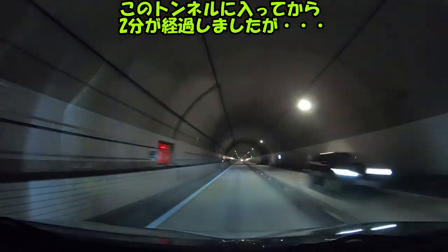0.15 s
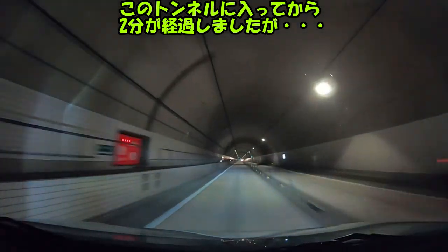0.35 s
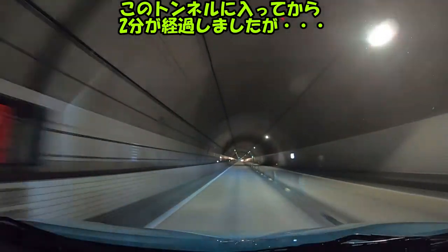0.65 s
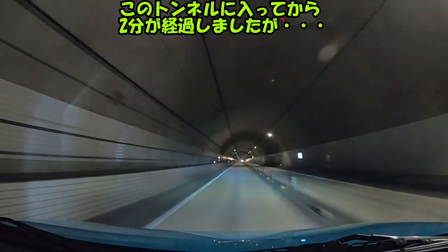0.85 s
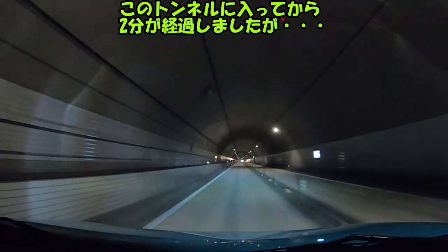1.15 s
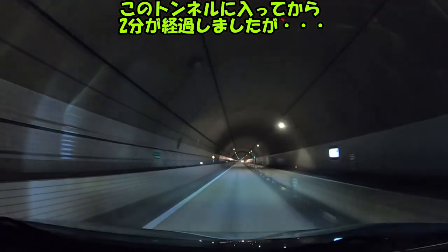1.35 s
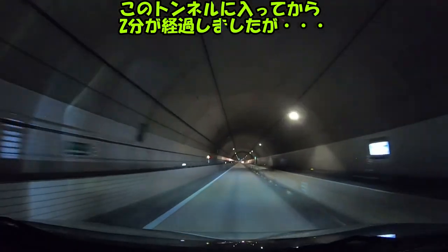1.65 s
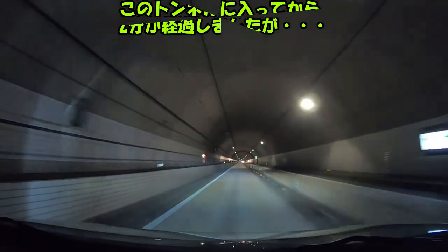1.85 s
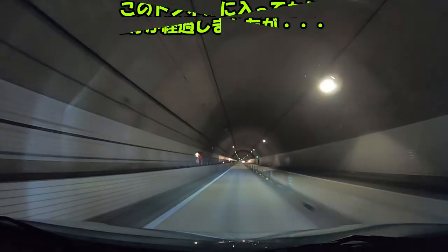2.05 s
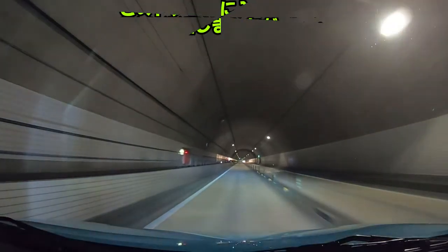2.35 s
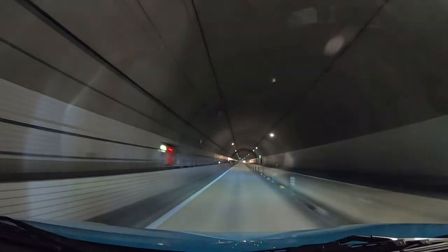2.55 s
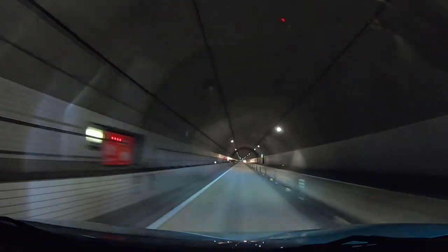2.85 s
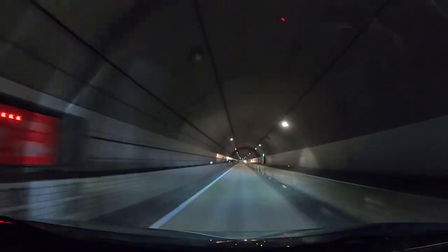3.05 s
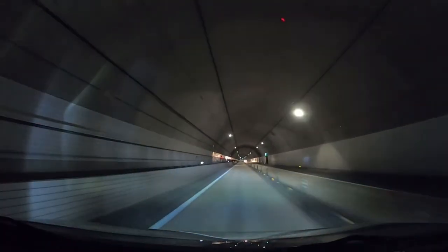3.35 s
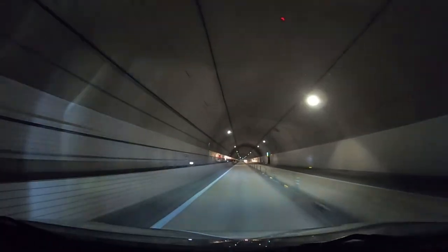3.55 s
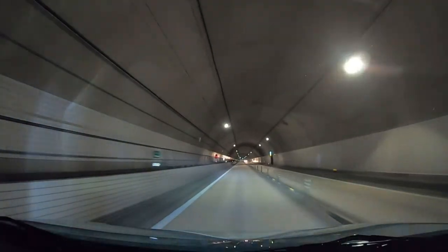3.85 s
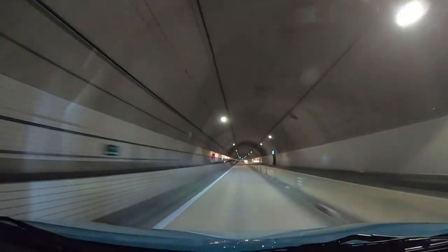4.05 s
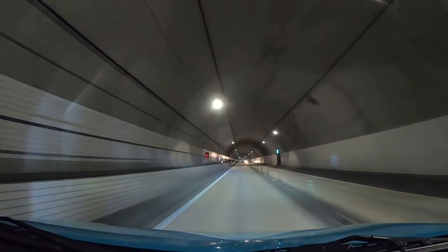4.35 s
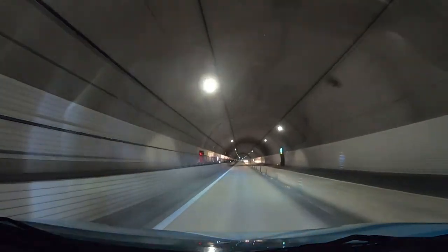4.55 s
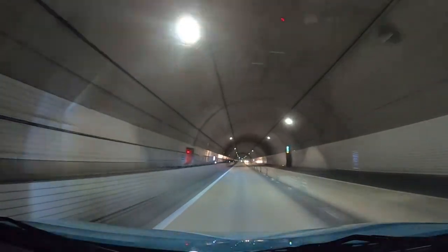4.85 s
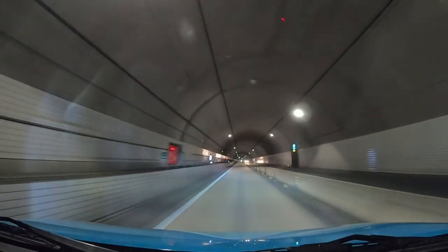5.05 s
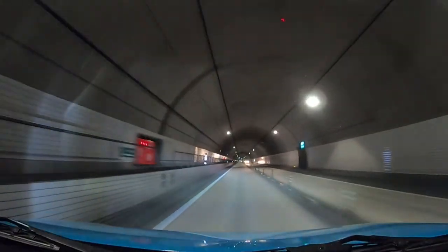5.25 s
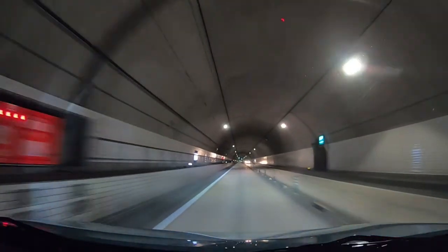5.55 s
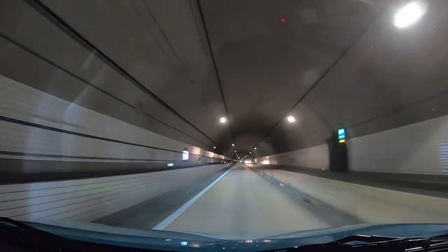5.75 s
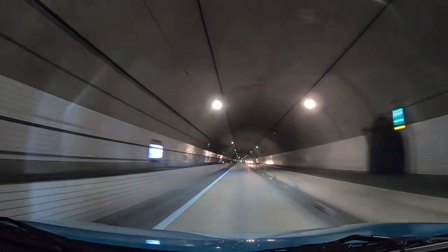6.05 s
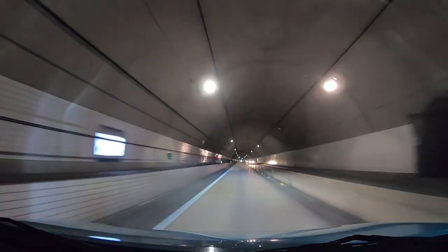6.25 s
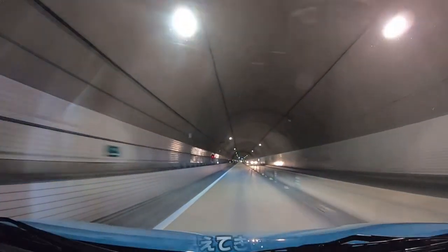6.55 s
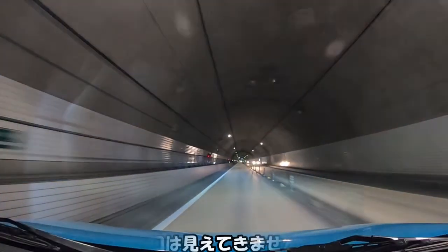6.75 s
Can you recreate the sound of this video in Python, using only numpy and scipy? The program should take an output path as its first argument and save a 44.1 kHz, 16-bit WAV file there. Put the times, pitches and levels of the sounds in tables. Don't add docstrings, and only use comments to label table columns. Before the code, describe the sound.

Heard from the dashboard of a car driving fast through a tunnel: a heavy low boom, humming tyres and droning engine run throughout. Tyre and wind roar reflects from the walls, slightly brighter at first just after an oncoming car. A faint fan whine rises and passes near one second, and plastic trim ticks very quietly here and there.

```python
import sys
import numpy as np
from scipy import signal
from scipy.fft import rfft, irfft
from scipy.io import wavfile
from scipy.ndimage import uniform_filter1d

SR = 44100
rng = np.random.default_rng(int(sys.argv[2]) if len(sys.argv) > 2 else 0)


def magnitude_from_level(level_db):
    exponent = np.asarray(level_db, float) / 20
    return 10 ** exponent


def master(y):
    cut = np.clip(np.atleast_2d(y).T, -1, 1)
    pcm = np.round(cut * 32767)
    wavfile.write(sys.argv[1], SR, pcm.astype(np.int16))


N = 304290

# centre [s], half length [s], added level [dB].
BOOM_SWELLS = [(0.1, 0.07, -21), (0.4, 0.05, -38), (0.56, 0.029, -28), (0.93, 0.086, -32),
               (1.22, 0.058, -22), (1.6, 0.08, -23), (1.96, 0.051, -22), (2.07, 0.088, -27),
               (2.38, 0.16, -39), (2.56, 0.11, -28), (2.79, 0.18, -25), (3.34, 0.19, -31.5),
               (3.58, 0.18, -26.5), (3.81, 0.029, -24), (3.91, 0.08, -24.5), (4.15, 0.13, -32),
               (4.56, 0.11, -24), (4.93, 0.12, -26), (5.23, 0.15, -24), (5.55, 0.25, -30),
               (5.88, 0.04, -24), (6.17, 0.099, -26), (6.41, 0.045, -33), (6.62, 0.098, -30)]
# centre [s], half length [s], added level [dB].
TYRE_SWELLS = [(0.02, 0.047, -29.5), (0.31, 0.18, -30), (0.6, 0.07, -25), (0.85, 0.23, -27.5),
               (1.07, 0.04, -33), (1.24, 0.057, -45), (1.47, 0.074, -30.5), (1.76, 0.039, -34),
               (1.88, 0.11, -38.5), (2.05, 0.045, -26.5), (2.25, 0.08, -37.5), (2.65, 0.14, -27),
               (2.87, 0.055, -29.0), (3.1, 0.085, -45.5), (3.36, 0.11, -27), (3.68, 0.13, -24.5),
               (4.05, 0.1, -31.5), (4.35, 0.047, -29), (4.65, 0.076, -34), (4.89, 0.11, -32.5),
               (5.21, 0.067, -30), (5.45, 0.1, -32), (5.72, 0.13, -24.5), (5.92, 0.035, -27.5),
               (6.19, 0.1, -27.5), (6.59, 0.04, -35.5)]
# centre [s], half length [s], added level [dB], pitch [Hz].
ENGINE_SWELLS = [(0.43, 0.21, -32.5, 115.5), (0.7, 0.06, -34, 116.3), (0.91, 0.043, -30, 111.9),
                 (1.12, 0.14, -28, 112.8), (1.56, 0.21, -39, 113.7), (1.98, 0.07, -30, 111.5),
                 (2.31, 0.12, -27, 110), (2.56, 0.052, -36, 111.6), (2.74, 0.06, -34, 114.8),
                 (3.02, 0.033, -18.5, 114.1), (3.12, 0.026, -23.5, 111.6), (3.32, 0.029, -28, 117),
                 (3.61, 0.12, -24, 112.6), (3.84, 0.064, -28, 112.9), (4.03, 0.05, -26, 111.4),
                 (4.2, 0.054, -21.5, 115.5), (4.37, 0.032, -26, 114.2), (4.58, 0.067, -24.5, 113.4),
                 (4.77, 0.04, -25, 112.1), (4.91, 0.02, -28.5, 110.8), (5.04, 0.055, -24.5, 113.8),
                 (5.23, 0.03, -24, 113.4), (5.64, 0.12, -26.5, 114.1), (6.29, 0.19, -28, 115.1),
                 (6.61, 0.038, -27, 114.8), (6.77, 0.037, -28.5, 117.7)]
# resonance [Hz], width [Hz], level [dB].
LARGE_PANELS = [(22, 7.7, -3.5), (40.8, 4.1, -1.5), (50.3, 9, 0.5), (62.5, 12, -9), (82.7, 31, -4),
                (96.4, 13, -1), (103.3, 11, -5)]
# centre [s], half length [s], added level [dB].
LARGE_JOLTS = [(0.1, 0.072, -41), (0.42, 0.15, -27), (0.83, 0.092, -30), (1.15, 0.12, -30.5),
               (1.49, 0.066, -39.5), (1.79, 0.16, -29.5), (2.19, 0.04, -35.5), (2.37, 0.066, -26.5),
               (2.79, 0.23, -30.5), (3.2, 0.067, -30), (3.53, 0.23, -36), (3.73, 0.031, -28),
               (3.98, 0.23, -36.5), (4.28, 0.04, -32.5), (4.42, 0.05, -24), (4.72, 0.15, -36.5),
               (4.73, 0.071, -32.5), (4.97, 0.067, -27.5), (5.26, 0.04, -35.0), (5.49, 0.035, -32),
               (5.78, 0.13, -28.5), (6.1, 0.047, -30), (6.36, 0.17, -24.5), (6.75, 0.12, -29.5)]
# resonance [Hz], width [Hz], level [dB].
SMALL_PANEL_MODES = [(131.1, 12, 6.5), (140.9, 16, 4.5), (163.8, 13, 4), (185, 22, 1.5), (211, 12, -13),
                     (218.4, 27, -0.5), (253.5, 18, 3.5), (281.2, 32, -1), (323, 52, -8), (358, 10, -6.5),
                     (401.5, 30, -10), (428, 11, -9), (463, 15, -17), (613, 36, -20), (624, 24, -20)]
# centre [s], half length [s], added level [dB].
SMALL_PANEL_JOLTS = [(0.1, 0.1, -39), (0.66, 0.21, -37), (1.17, 0.19, -39.5), (1.55, 0.082, -42),
                     (1.89, 0.1, -41), (2.17, 0.024, -32), (2.42, 0.2, -40), (2.71, 0.04, -39),
                     (3.05, 0.21, -39.5), (3.26, 0.024, -42), (3.67, 0.06, -32.5), (3.89, 0.12, -52.5),
                     (4.13, 0.044, -34.5), (4.53, 0.15, -44.5), (4.83, 0.098, -39), (5.2, 0.085, -44),
                     (5.32, 0.041, -36.5), (5.66, 0.11, -40.5), (5.91, 0.077, -33.5), (6.32, 0.06, -41),
                     (6.53, 0.036, -40), (6.78, 0.07, -36)]
# centre [Hz], width [Hz], level [dB].
PORT_WIND = [(30, 30, 5.5), (70, 40, -2.5), (110, 50, -7.0)]
# time [s], level [dB].
ROAR_LEVEL = [(0.0, -41.5), (1.5, -42), (3.1, -42.5), (4.3, -42.5), (5.2, -43), (6.0, -41.5), (6.9, -42)]
# frequency [Hz], density [dB per Hz].
ROAR_SPECTRUM = [(410, -14.5), (610, -23.5), (1000, -25), (1450, -29.5), (1800, -32), (2050, -37.5),
                 (3400, -43.5), (4700, -51), (4900, -54), (5600, -55.5)]
# frequency [Hz], level relative to the end of the roar [dB].
WIND_HISS = [(6100, -4.5), (7000, -5.5), (7600, -9), (9200, -14), (10000, -20), (10600, -25), (11500, -29),
             (12000, -30), (13500, -26), (15500, -25)]
# frequency [Hz], left-right correlation [0 to 1].
PORT_LIKENESS = [(380, 0.86), (700, 0.53), (1100, 0.73), (1500, 0.47), (1600, 0.73), (1850, .65),
                 (2000, .3), (3500, 0.43), (3700, .55), (4800, .5), (5200, 0.05), (9000, 0.5)]
# frequency [Hz], lead of the left [radians].
LEFT_LEAD = [(0, 0.47), (600, -0.52), (1030, 2.08), (1380, 0.65), (1640, 0.39), (1980, 1.2), (2330, 0),
             (5000, -0.17)]
# frequency [Hz], left minus right [dB].
PORT_BALANCE = [(250, 0.5), (660, -1.5), (1700, -1.3), (4460, -1.3), (9000, -3.5)]
# time [s], peak level [dB], left minus right [dB], extra level of the thin top modes [dB].
TRIM_TICKS = [(0.079, -76, 0, 0), (0.266, -75, 0, 17), (0.289, -65, -2.5, -18), (0.34, -74, -2, 14),
              (0.7268, -66, -2, 6), (1.0864, -69, -3, -19), (1.1937, -64, -1, -18), (1.285, -65, -1, -18),
              (1.3803, -64, 0, -18), (1.4597, -74, -3.5, 15), (1.7764, -65, 1, -14), (1.8637, -67, -1, -14),
              (2.48, -69.5, -1, 10), (2.7911, -62, -1.5, -18), (2.905, -69, 1, -6),
              (3.12, -69.5, -4.5, 11.5), (3.46, -66.5, 4, -13), (3.5937, -59.5, -2, -6.5),
              (3.6847, -54.5, 1, -9), (3.692, -59, 0, -8), (3.711, -63, -2, -11), (3.826, -75, -3, 18.5),
              (3.905, -74, 2, 16), (4.7696, -60, -1.5, -16), (5.064, -64, 0, -18), (5.16, -66, 0, -18),
              (5.4798, -71.5, 2.5, 12.5), (5.617, -75, 0.5, 15.5), (5.6376, -59, -1, -18),
              (5.677, -68.5, 0, -14), (5.7753, -64, -2, -18)]
# frequency [Hz], level [dB], time to fall 60 dB [s].
TRIM_MODES = [(5200, 0.5, .004), (6800, 2.5, .005), (7800, -3, .005), (8700, -2.5, .006), (9600, -2, 0.007),
              (11000, -4, .002), (12000, -4, .002), (13000, -4, .002), (14000, -4, .002), (14800, -4, .002)]
# time [s], level [dB], pitch [Hz].
FAN_WHINES = [
    [(.78, -55, 1700), (.88, -53, 1712), (.96, -51.5, 1708), (1.06, -52.5, 1725), (1.15, -48, 1765),
     (1.22, -55, 1785), (1.3, -52, 1800), (1.42, -60, 1810)],
    [(.35, -82, 4690), (.55, -77, 4660), (.66, -65.5, 4700), (.74, -69, 4690), (.85, -74, 4680),
     (1.1, -77, 4700), (1.25, -77, 4654)],
]


def evened(x):
    return x / np.sqrt(np.mean(abs(x) ** 2) + 1e-20)


def read(points, hz):
    f, value = np.transpose(points)
    return np.interp(np.log(hz + 1), np.log(f + 1), value)


def curves(rows):
    s, *columns = np.transpose(rows)
    return [np.interp(np.arange(N) / SR, s, c) for c in columns]


def swells(rows, rest_db):
    t = np.arange(0, N + 100, 100) / SR
    level = magnitude_from_level(rest_db)
    level = level + sum(magnitude_from_level(db) * np.exp(-((t - s) / half) ** 2) for s, half, db, *_ in rows)
    return np.interp(np.arange(N) / SR, t, 20 * np.log10(level))


def drift(hz):
    f = np.fft.fftfreq(N, 1 / SR)
    noise = rng.standard_normal((N, 2)) @ [1, 1j]
    return evened(np.fft.ifft(noise * np.exp(-(f / hz) ** 2)))


def fuzzy_tone(db, hz, fuzz, fuzz_hz):
    carrier = np.exp(2j * np.pi * np.cumsum(hz * np.ones(N)) / SR)
    tone = carrier * (1 + fuzz * drift(fuzz_hz))
    return magnitude_from_level(db) * evened(tone.real)


def panels(modes, level_db, steady, smooth_s):
    hz = np.fft.rfftfreq(N, 1 / SR)
    power = sum(magnitude_from_level(2 * db) / (1 + (2 * (hz - f) / width) ** 2) ** 2 for f, width, db in modes)
    x = evened(irfft(rfft(rng.standard_normal(N)) * np.sqrt(power), N))
    swell = np.convolve(x[::50] ** 2, np.hanning(round(smooth_s * SR / 50)), "same")
    swell = np.interp(np.arange(N), np.arange(len(swell)) * 50, swell / swell.mean())
    return magnitude_from_level(level_db) * evened(x / (swell + .05) ** (steady / 2))


def cabin_boom():
    return fuzzy_tone(swells(BOOM_SWELLS, rest_db=-28), hz=33.43, fuzz=0.32, fuzz_hz=3.4)


def tyre_hum():
    return fuzzy_tone(swells(TYRE_SWELLS, rest_db=-38.5), hz=233.2, fuzz=0.12, fuzz_hz=6.8)


def engine_drone():
    pitch_hz = curves(ENGINE_SWELLS)[2] + 5.0 * drift(hz=9.26).real
    return fuzzy_tone(swells(ENGINE_SWELLS, rest_db=-31), pitch_hz, fuzz=0.52, fuzz_hz=13)


def body_panels():
    large_db = swells(LARGE_JOLTS, rest_db=-25.5) + 0.59
    small_db = swells(SMALL_PANEL_JOLTS, rest_db=-29.5) + 1.5
    large = panels(LARGE_PANELS, large_db, steady=1.0, smooth_s=0.23)
    return large + panels(SMALL_PANEL_MODES, small_db, steady=0.83, smooth_s=0.3)


def port_differences():
    wind = panels(PORT_WIND, -43.5, steady=0, smooth_s=.1)
    return wind + panels(SMALL_PANEL_MODES, -46.0, steady=0, smooth_s=.1)


def body():
    mid = cabin_boom() + tyre_hum() + engine_drone() + body_panels()
    return mid * magnitude_from_level([[-.2], [.2]]) + port_differences() * np.array([[1], [-1]])


def hiss_edge_db(hz, frames):
    gusts = rng.standard_normal((frames, 513)).T
    gusts = uniform_filter1d(gusts, size=14, axis=0)
    gusts = evened(uniform_filter1d(gusts, size=6, axis=1))
    gusts_db = 3.5 * gusts * np.clip((hz[:, None] - 9800) / 1500, 0, 1)
    flutter = evened(uniform_filter1d(rng.standard_normal(frames), size=6))
    edge_hz = 10600 + 260 * flutter
    return gusts_db - 17 * np.clip((hz[:, None] - edge_hz) / 150, 0, 1)


def oncoming_db(hz, t):
    band = np.exp(-(np.log2((hz + 1) / 3950) / 1.0) ** 2)
    return np.outer(band, 3.5 * np.exp(-(t / 0.95) ** 2))


def roar():
    frames, hz = N // 256 + 5, np.fft.rfftfreq(1024, 1 / SR)
    at = np.arange(frames) * 256
    a, b, c, d, patches = rng.standard_normal((frames, 513, 5)).T
    patches = uniform_filter1d(patches, size=10, axis=0)
    patches = evened(uniform_filter1d(patches, size=20, axis=1))
    level_db = np.interp(at, np.arange(N), curves(ROAR_LEVEL)[0])

    same = np.clip(read(PORT_LIKENESS, hz), -1, 1)[:, None]
    left = a + 1j * b
    right = same * left + np.sqrt(1 - same ** 2) * (c + 1j * d)
    right = right * np.exp(-1j * read(LEFT_LEAD, hz))[:, None]
    balance = magnitude_from_level(np.outer([.5, -.5], read(PORT_BALANCE, hz)))[:, :, None]
    z = np.array([left, right]) * balance

    roar_end_db = ROAR_SPECTRUM[-1][1]
    spectrum = ROAR_SPECTRUM + [(f, db + roar_end_db) for f, db in WIND_HISS]
    glass_db = -12 * np.log2(np.clip(600 / (hz + 1), 1, None))
    colour_db = read(spectrum, hz) + glass_db
    shape_db = colour_db[:, None] + 0.31 * patches + hiss_edge_db(hz, frames)
    shape_db = shape_db + oncoming_db(hz, at / SR) + level_db
    x = signal.istft(z * magnitude_from_level(shape_db), nperseg=1024, noverlap=768)[1][:, :N]

    power = magnitude_from_level(2 * colour_db)
    band_share = np.sqrt(np.sum(power[(hz > 600) & (hz < 2000)]) / np.sum(power))
    return evened(x) / band_share * np.sqrt(np.mean(magnitude_from_level(2 * level_db))) * magnitude_from_level(2.5)


def trim_ticks():
    t, out = np.arange(600) / SR, np.zeros((2, N + 600))
    rise_s, scraping = .0002, 0.8
    scrapes = rng.standard_normal((len(TRIM_TICKS), 2, 600))
    scrapes = evened(signal.lfilter([1], [1, -.87], scrapes))
    detunes = rng.uniform(1.0, 1.05, (len(TRIM_TICKS), len(TRIM_MODES)))
    for (s, db, pan_db, thin_db), detune, scrape in zip(TRIM_TICKS, detunes, scrapes):
        ring = 0
        for (hz, mode_db, t60), k in zip(TRIM_MODES, detune):
            decay_db = mode_db + thin_db * (hz > 10500) - 60 * t / t60
            ring = ring + magnitude_from_level(decay_db) * np.sin(2 * np.pi * hz * k * t)
        ring = ring * (1 - np.exp(-t / rise_s))
        ring = ring * (1 + scraping * scrape) / np.hypot(1, scraping)
        at = round(s * SR)
        out[:, at:at + 600] += magnitude_from_level(db - 1.0 + np.array([[.5], [-.5]]) * pan_db) * ring
    return out[:, :N]


def fan_whine(rows):
    start, end = rows[0][0], rows[-1][0]
    on = np.interp(np.arange(N) / SR, [start, start + 0.1, end - .08, end], [0, 1, 1, 0])
    level_db, pitch_hz = curves(rows)
    return magnitude_from_level([[.3], [-.3]]) * on * fuzzy_tone(level_db, pitch_hz, fuzz=1.1, fuzz_hz=75)


def scene():
    return body() + roar() + trim_ticks() + sum(fan_whine(rows) for rows in FAN_WHINES)


def roll_off(x):
    return signal.sosfilt(signal.butter(12, 14900, fs=SR, output="sos"), x)


def record(dry):
    ceiling = .66
    held = ceiling * np.tanh(dry / ceiling)
    fade = np.interp(np.arange(N), [0, 400, N - 400, N], [.37, 1, 1, .25])
    mix = held * np.sin(fade * np.pi / 2) ** 2
    return roll_off(mix)


dry = scene()
out = record(dry)
master(out)
```